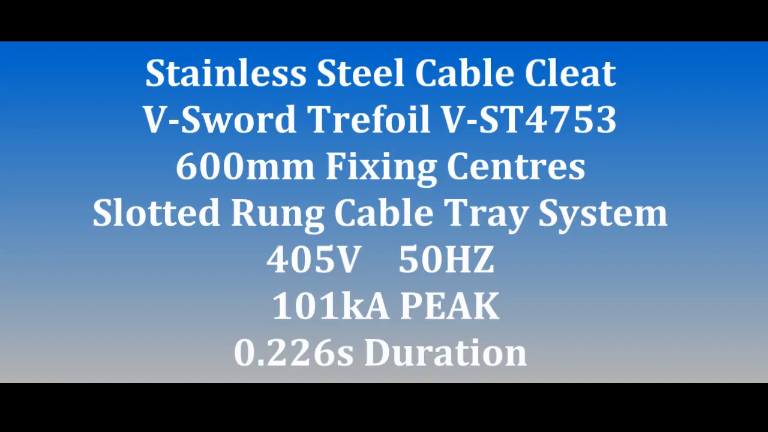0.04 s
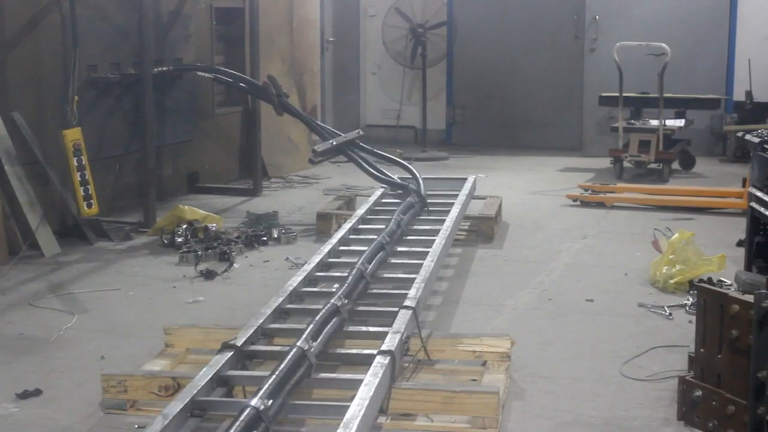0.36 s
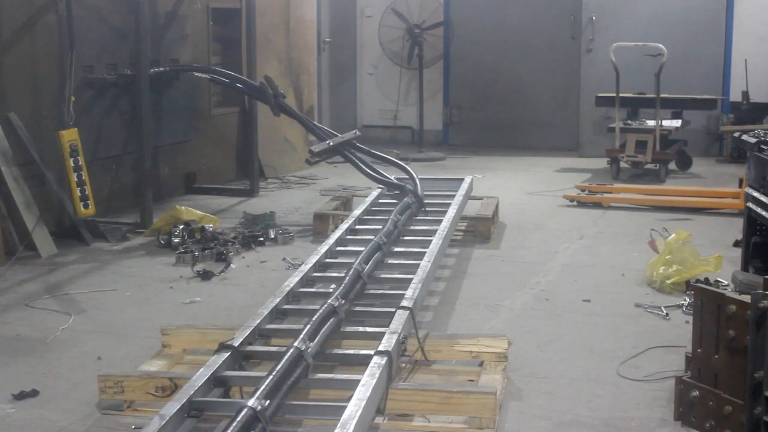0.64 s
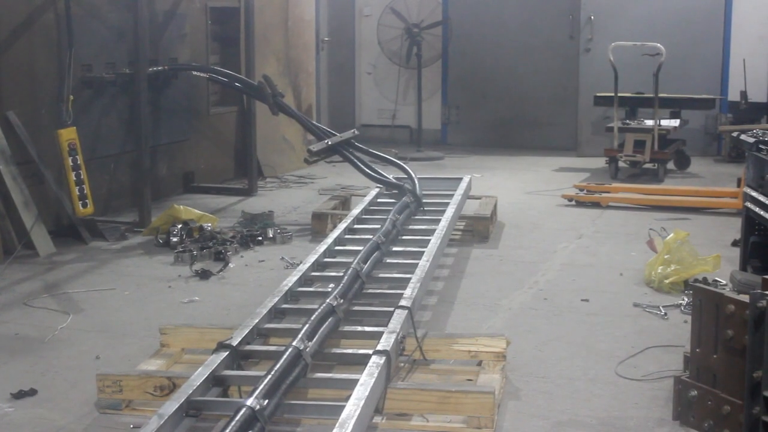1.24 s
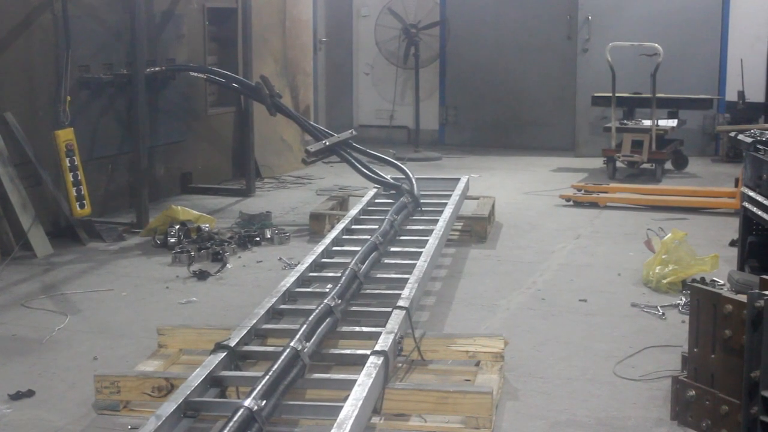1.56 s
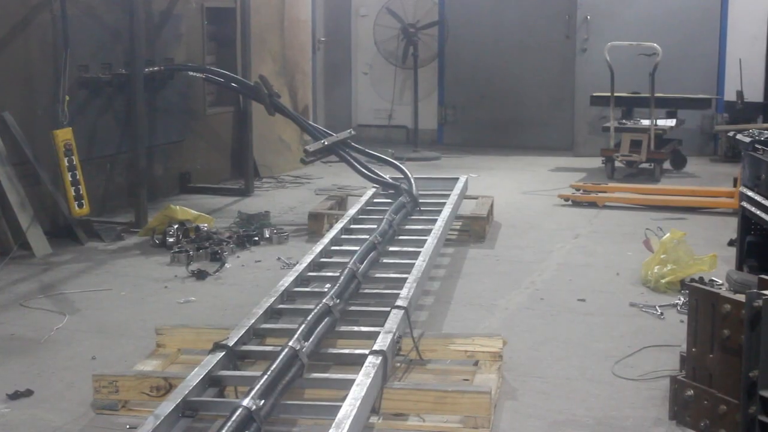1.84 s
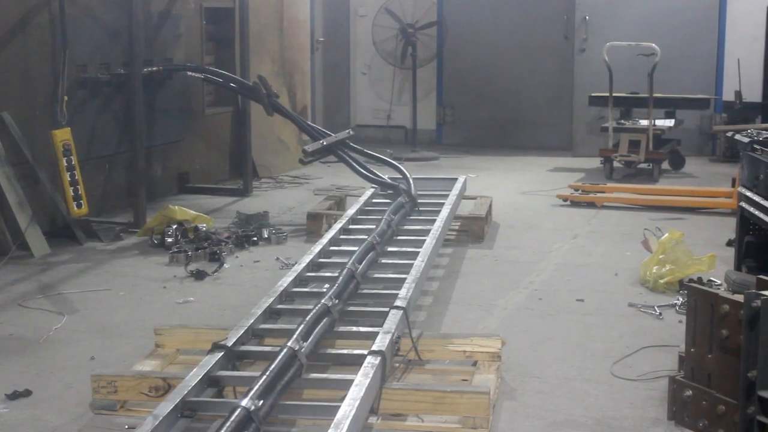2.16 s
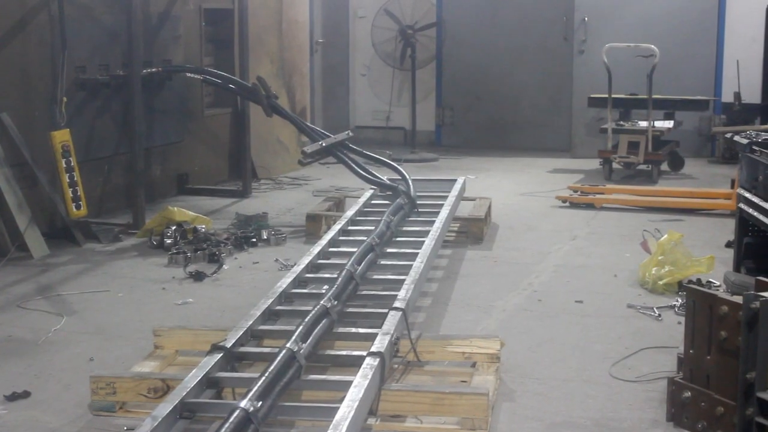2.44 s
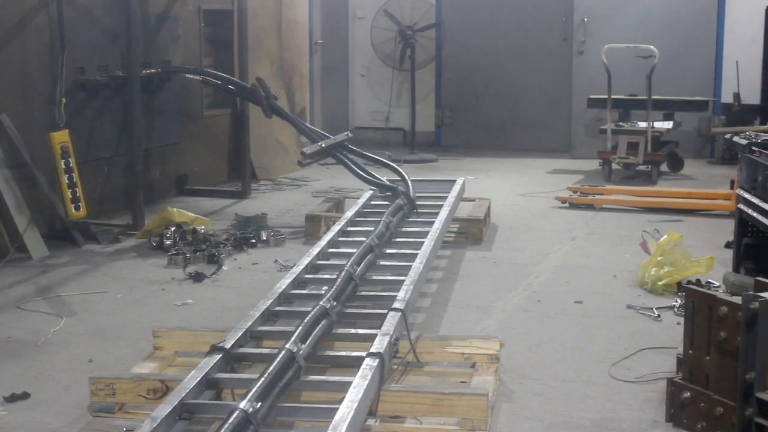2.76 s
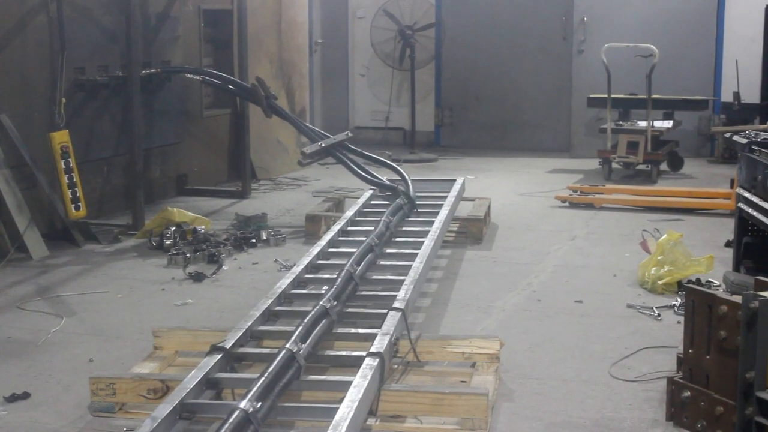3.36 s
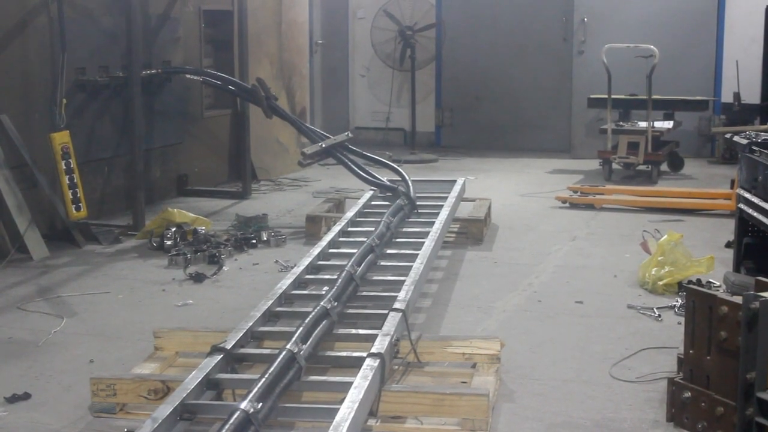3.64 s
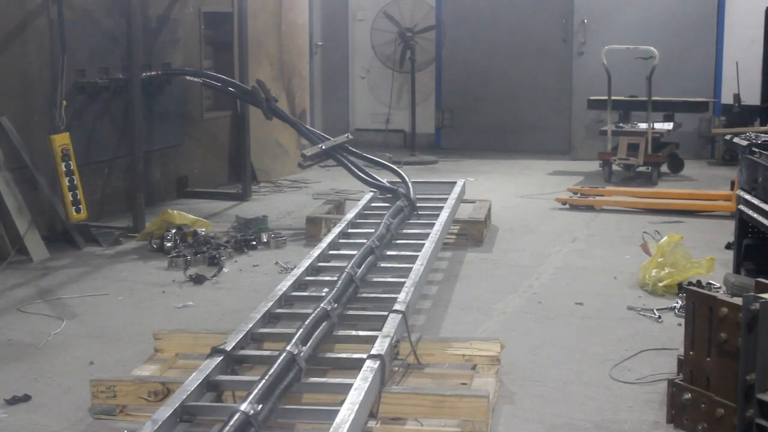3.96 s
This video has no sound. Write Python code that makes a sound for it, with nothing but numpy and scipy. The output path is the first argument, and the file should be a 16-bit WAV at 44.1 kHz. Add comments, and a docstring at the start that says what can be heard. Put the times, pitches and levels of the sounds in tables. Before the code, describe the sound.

A low machinery hum with droning motors and rushing fan air fades in from silence between 0.3 and 1.4 seconds, then holds steady in a large hall. A soft scuff comes at 1.5 seconds, and faint tiny ticks from 2.1. Two dull distant bumps land near 2.5 seconds. More light ticks and scuffs follow from 3.4 to 4 seconds, with a weaker bump around 3.7.

```python
"""Out of silence, a large test hall fades in: mains-fed iron hums in a harmonic series, motor and fan
tones beat against it, and moving air adds a broadband rush, all blurred by the room.
From about 1.5 s soft scuffs come through as puffs of noise, and from 2.1 s faint ticks of tiny hard
parts ringing. Two dull far bumps follow near 2.5 s, then more ticks and scuffs and a third bump."""
import sys
import numpy as np
from scipy import signal
from scipy.fft import rfft, irfft
from scipy.io import wavfile
from scipy.ndimage import uniform_filter1d

SR = 44100
rng = np.random.default_rng(int(sys.argv[2]) if len(sys.argv) > 2 else 0)


def log_audio(samples):
    """Write samples as a 16-bit WAV file to the path given in sys.argv[1]."""
    # one column per channel
    frames = np.atleast_2d(samples).T
    # limit to full scale, then quantise
    limited = np.clip(frames, -1, 1)
    pcm = np.round(limited * 32767).astype(np.int16)
    wavfile.write(sys.argv[1], SR, pcm)


N = 176400


def amp(db):
    """Amplitude ratio of a level in decibels."""
    return 10 ** (np.asarray(db) / 20)


def unit(x):
    """Normalisation to an rms of 1."""
    return x / np.sqrt(np.mean(abs(x) ** 2) + 1e-20)


def bell(hz, centre_hz, octaves):
    """Gaussian passband on a logarithmic frequency axis."""
    return np.exp(-.5 * (np.log2((hz + 1) / centre_hz) / octaves) ** 2)


def noise(gain):
    """Spectral shaping: white noise weighted by a gain at every frequency."""
    return irfft(rfft(rng.standard_normal(N)) * gain, N)


def tone(hz, level_db, waver, waver_hz, scatter_turns):
    """Narrowband modulation: a sum of slow phasors makes a sinusoid drift in amplitude and phase."""
    t = np.arange(N) / SR
    knots = np.arange(0, N / SR + 1, 1 / 100)
    rates, turns = rng.standard_normal((12, 1)) * waver_hz, rng.random((12, 1))
    drift = unit(np.exp(2j * np.pi * (rates * knots + turns)).sum(0))
    modulation = np.interp(t, knots, 1 + waver * drift)
    carrier = np.exp(2j * np.pi * (hz * t + scatter_turns * (rng.random() - .5)))
    return amp(level_db) * unit((modulation * carrier).real)


def hum():
    """Forced vibration: iron cores buzz at harmonics of the mains; the hall scatters their phases."""
    # mains harmonics: harmonic number, level/dB
    harmonics = [(1, -61), (2, -43), (3, -50), (4, -38), (5, -50), (7, -44), (8, -49), (9, -55), (10, -51),
                 (11, -60), (12, -57), (14, -57), (15, -65), (16, -65), (17, -64), (18, -65), (20, -65),
                 (22, -65), (23, -65), (24, -68)]
    mains_hz = 50.015
    return amp(0.28) * sum(tone(round(k) * mains_hz, db, waver=0.056, waver_hz=2.2, scatter_turns=0.66)
                           for k, db in harmonics)


def motors():
    """Beating: shaft and blade tones interfere with the hum harmonics close to them in frequency."""
    # tones of motors and fans: f/Hz, level/dB
    lines = [(28.4, -63), (48.3, -56), (70.2, -60), (96.6, -52), (140.3, -44), (144.8, -54), (210.6, -55),
             (246.0, -51), (247.7, -48), (280.9, -54), (283.2, -59), (386.4, -56), (392.3, -56),
             (421.0, -55), (434.7, -57), (483.0, -60), (561.5, -59)]
    return amp(0.5) * sum(tone(hz, db, waver=0.19, waver_hz=1.5, scatter_turns=1) for hz, db in lines)


def air():
    """Broadband flow noise: the fans' rush, slightly patchy, with a quick flutter in its middle range."""
    # spectrum of the moving air: f/Hz, relative spectral density level/dB
    spectrum = [(15, -95), (30, -71), (60, -73), (80, -71), (105, -61.5), (170, -62), (220, -65.5),
                (320, -65.5), (420, -67.5), (520, -69.5), (640, -75.5), (780, -73.5), (900, -76.5),
                (1250, -78), (1850, -79.5), (2300, -85.5), (3000, -89), (4500, -96), (6200, -99.5),
                (9000, -102.6), (14000, -103.7)]
    air_db, patchy_db, patch_s, patch_hz = -0.57, 0.55, .09, 400
    flutter_hz, flutter_depth = 12.8, 0.06
    f, db = np.transpose(spectrum)
    density_db = np.interp(np.log(np.fft.rfftfreq(N, 1 / SR) + 1), np.log(f), db)
    rush = noise(amp(density_db)) * np.sqrt(SR / 2)
    hz, t, cells = signal.stft(rush, SR, nperseg=1024, noverlap=768)
    # random level offsets, smoothed over time and then over frequency
    patches = uniform_filter1d(rng.standard_normal(cells.shape), round(patch_s / t[1]), axis=1)
    patches = unit(uniform_filter1d(patches, round(patch_hz / hz[1]), axis=0))
    flutter_band = bell(hz, centre_hz=750, octaves=0.32)[:, None]
    flutter = 1 + flutter_depth * flutter_band * np.sin(2 * np.pi * flutter_hz * t)
    cells = cells * flutter * amp(air_db + patchy_db * patches)
    return signal.istft(cells, SR, nperseg=1024, noverlap=768)[1][:N]


def swell(peak_s, rise_s, fall_s, level_db, centre_hz, octaves):
    """Reverberant smearing: the hall turns a short sound into a noise band that rises and dies away."""
    t = np.arange(N) / SR - peak_s
    envelope = np.exp(-.5 * (t / np.where(t < 0, rise_s, fall_s)) ** 2)
    band = unit(noise(bell(np.fft.rfftfreq(N, 1 / SR), centre_hz, octaves)))
    return amp(level_db) * envelope * band


def scuffs():
    """Band-limited transients in the treble, heard as soft scuffs."""
    # scuffs: peak t/s, rise t/s, fall t/s, level/dB, centre f/Hz, width/octaves
    puffs = [(1.55, 0.028, .09, -59, 3000, .5), (2.14, .02, 0.06, -60, 7400, 0.43),
             (2.6, 0.09, 0.14, -63, 3580, .3), (3.445, 0.013, 0.029, -56.5, 4900, 0.54),
             (3.515, 0.02, 0.051, -60.5, 6550, .4), (3.805, 0.027, 0.14, -54, 3370, 0.74),
             (3.935, .045, 0.041, -50.5, 2660, 0.38)]
    return sum(swell(*row) for row in puffs)


def ticks():
    """Damped free vibration: at each tick the modes of a tiny hard part ring and decay exponentially."""
    # ticks: onset t/s, level/dB
    onsets = [(2.108, -51), (2.297, -51), (2.884, -57), (3.449, -55), (3.530, -54), (3.573, -54),
              (3.731, -47)]
    # modes of the part: f/Hz, relative level/dB, 60 dB decay t/s
    modes = [(6080, 1.5, 0.026), (10400, -6, .018), (11100, -4, 0.02), (11500, -4, .015)]
    rise_s = 0.0011
    sound = np.zeros(N)
    for start, level_db in onsets:
        t = np.maximum(np.arange(N) / SR - start, 0)
        ring = np.zeros(N)
        for hz, db, t60 in modes:
            decay = np.exp(-np.minimum(np.log(1000) * t / t60, 20))
            ring += amp(db) * decay * np.sin(2 * np.pi * (hz * t + rng.random()))
        sound += amp(level_db) * np.minimum(t / rise_s, 1) * ring
    return sound


def bumps():
    """Band-limited transients at low frequencies, heard as dull far bumps."""
    # bumps: peak t/s, rise t/s, fall t/s, level/dB, centre f/Hz, width/octaves
    thuds = [(2.41, 0.049, 0.087, -34, 320, 0.42), (2.53, 0.013, .04, -30.5, 153, 0.25),
             (3.67, 0.091, 0.067, -40.5, 348, 0.48)]
    return sum(swell(*row) for row in thuds)


def scene():
    """Superposition: the steady machines and air add to the transients in one channel."""
    steady = hum() + motors() + air()
    transients = ticks() + scuffs() + bumps()
    return (steady + transients)[None]


def record(dry):
    """Gain ramp and band limiting: a nearly linear fade-in from silence, then a low-pass filter."""
    start_s, fade_s, cutoff_hz = 0.33, 1.03, 14450
    fade = np.clip((np.arange(N) / SR - start_s) / fade_s, 0, 1) ** 0.99
    lowpass = signal.firwin(511, cutoff_hz, window=("kaiser", 9), fs=SR)
    return signal.oaconvolve(dry * fade, lowpass[None], "same")


dry = scene()
out = record(dry)
log_audio(out)
```